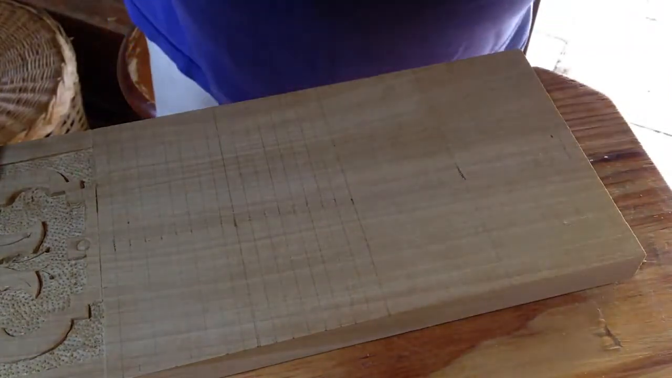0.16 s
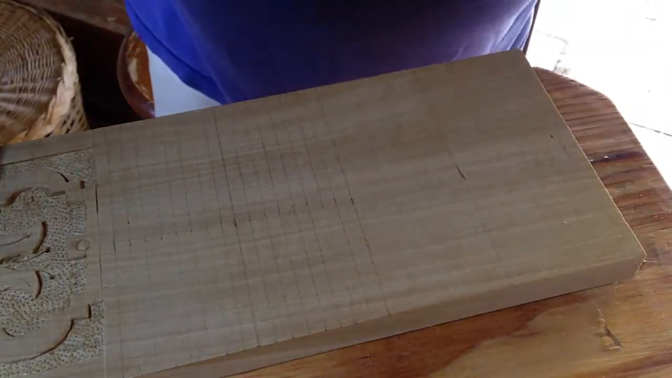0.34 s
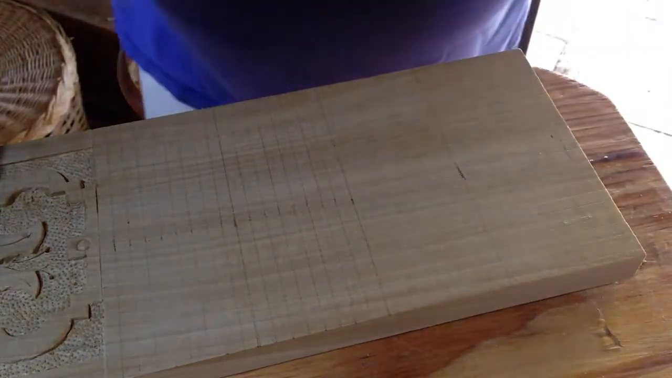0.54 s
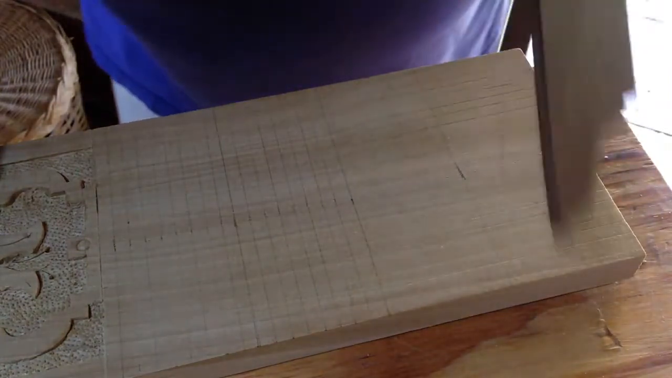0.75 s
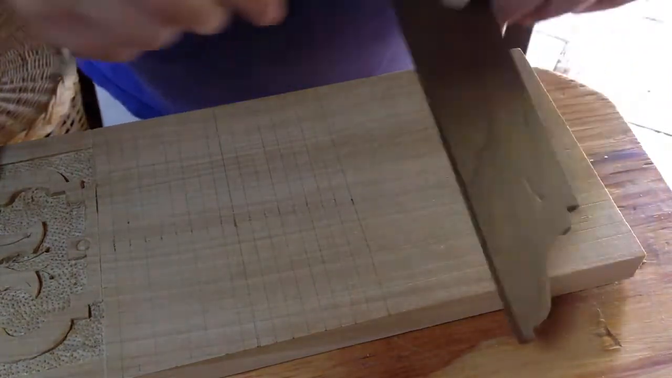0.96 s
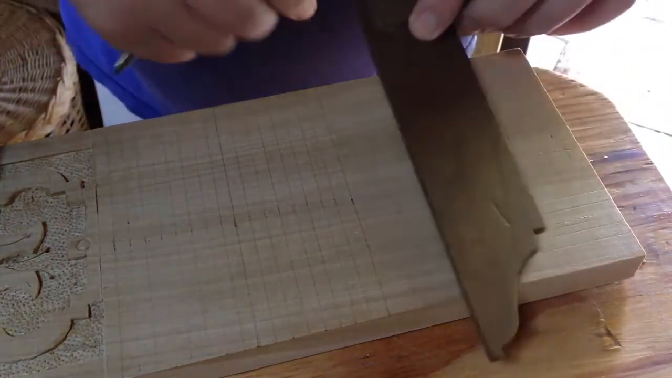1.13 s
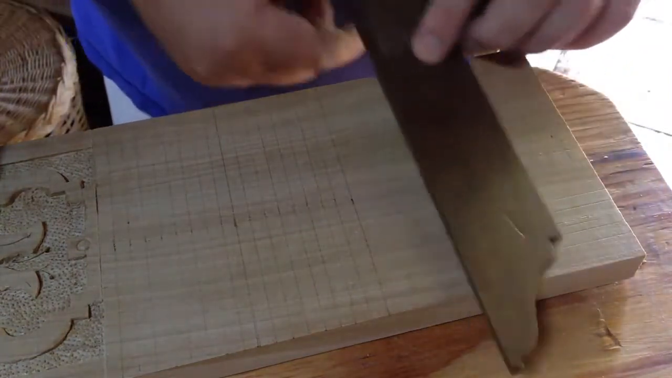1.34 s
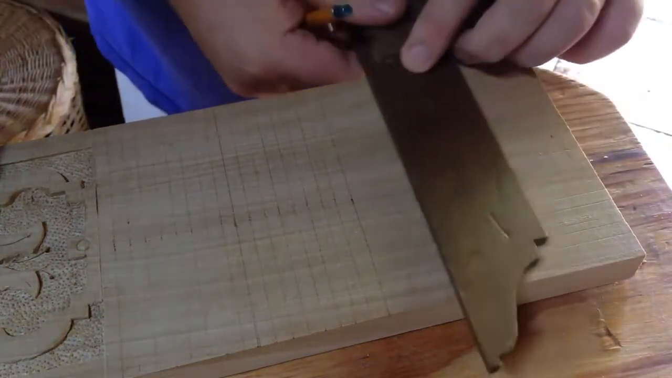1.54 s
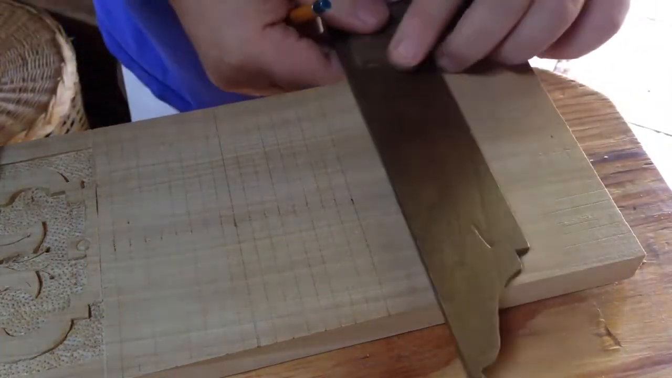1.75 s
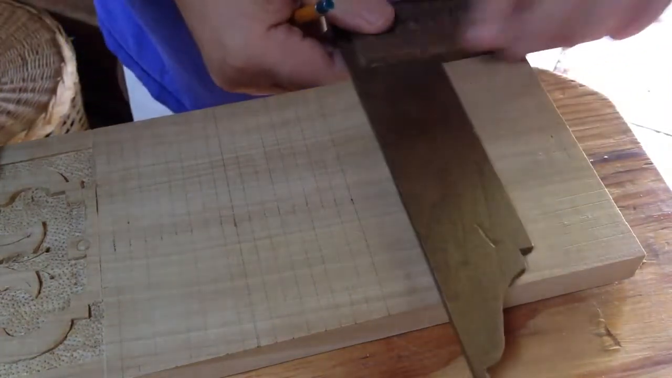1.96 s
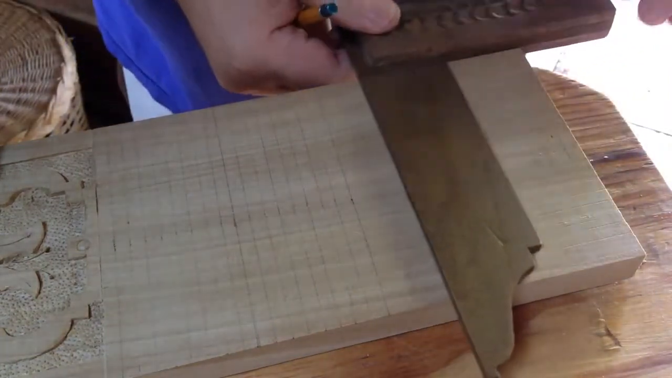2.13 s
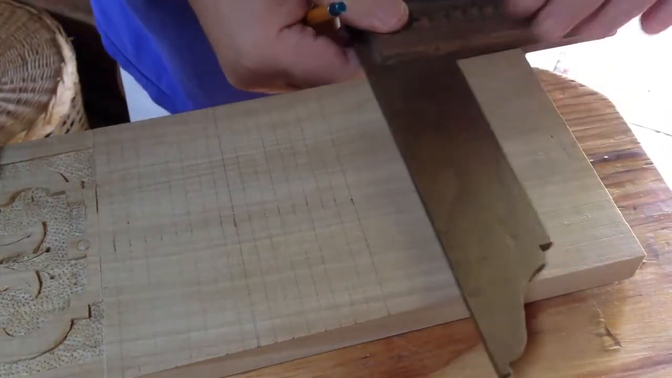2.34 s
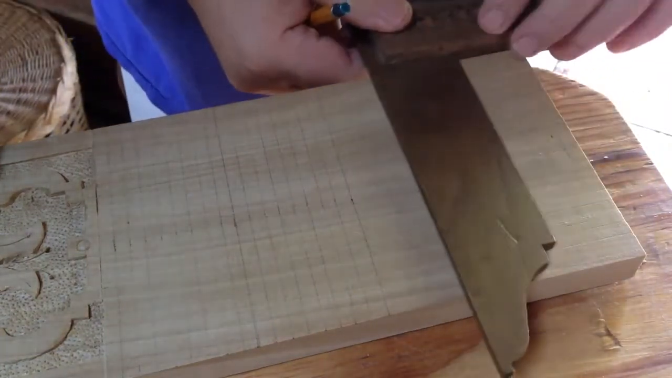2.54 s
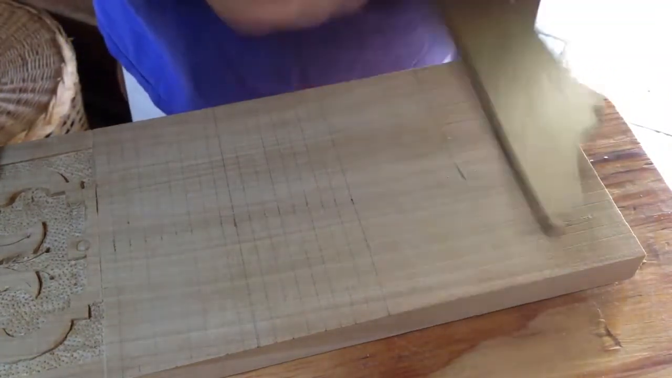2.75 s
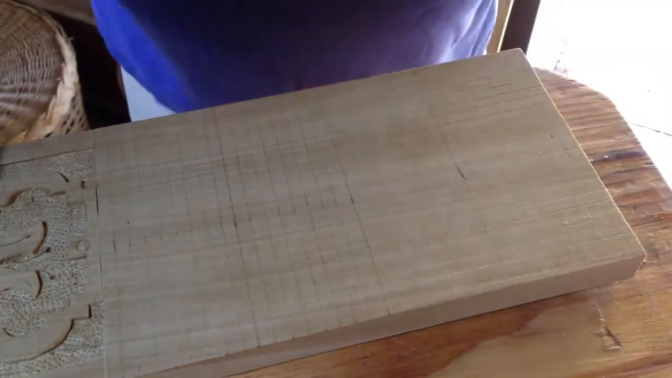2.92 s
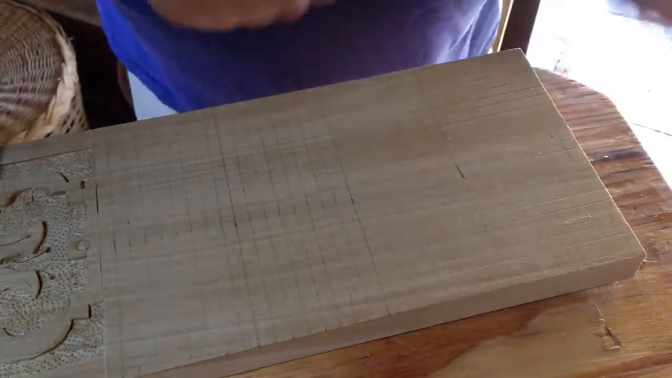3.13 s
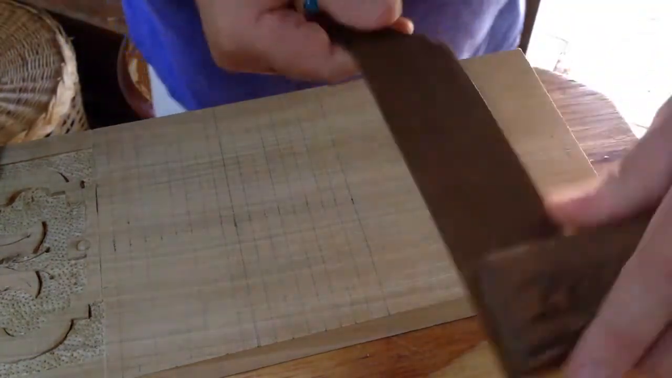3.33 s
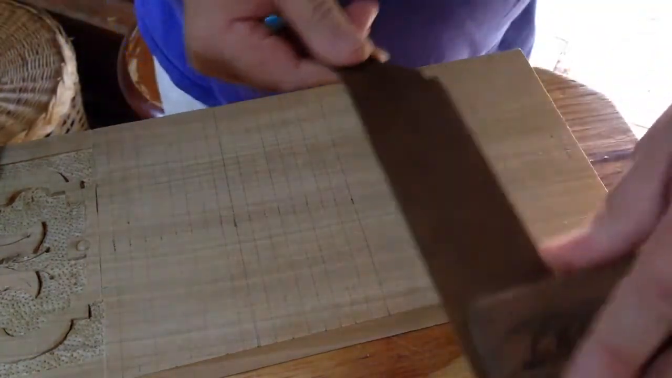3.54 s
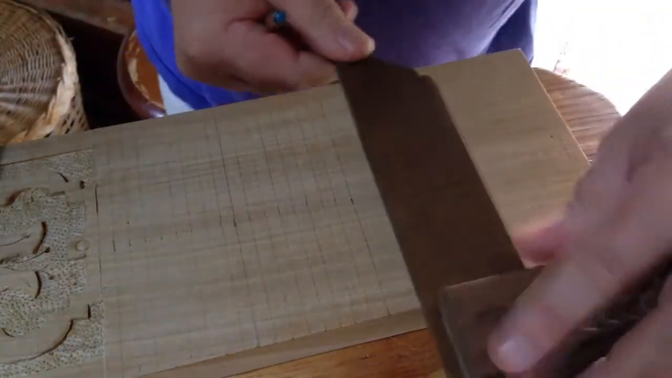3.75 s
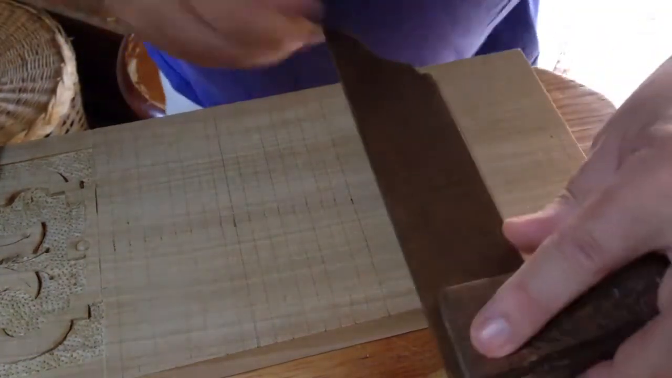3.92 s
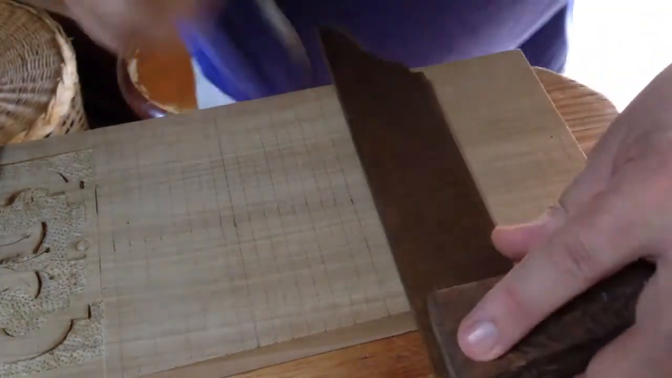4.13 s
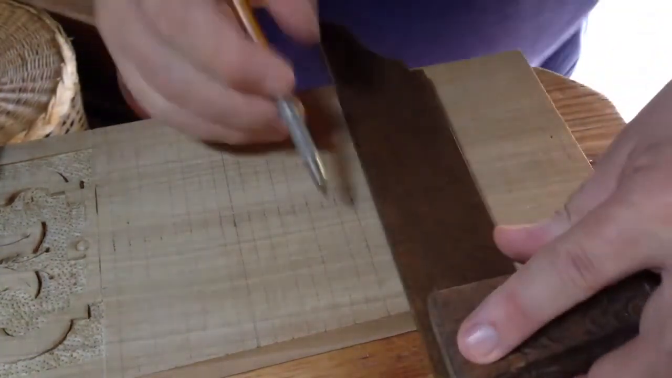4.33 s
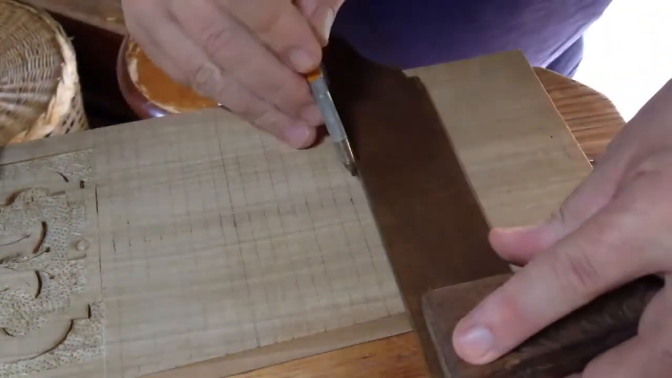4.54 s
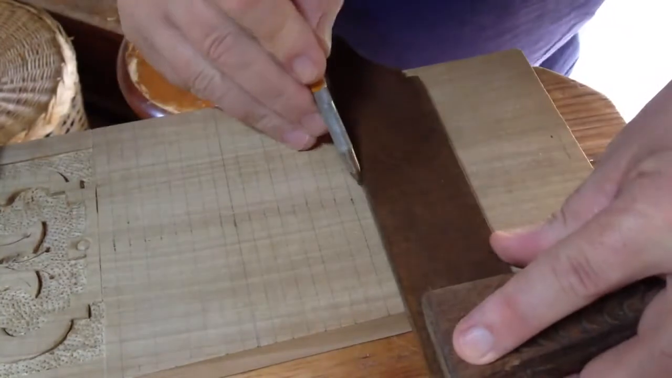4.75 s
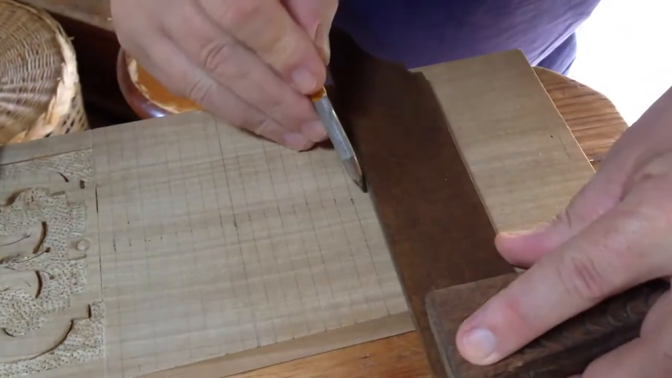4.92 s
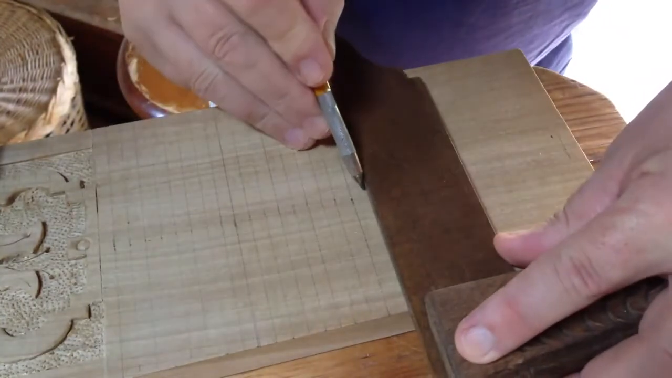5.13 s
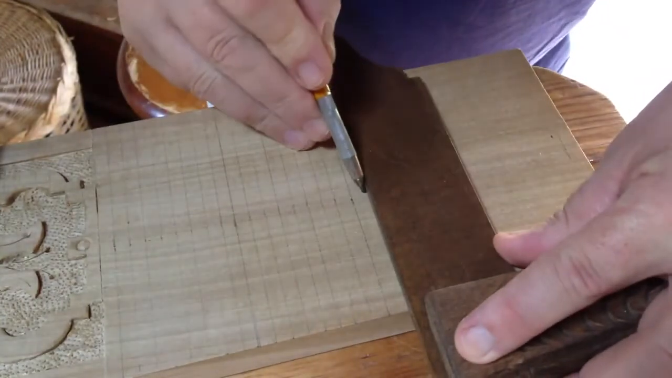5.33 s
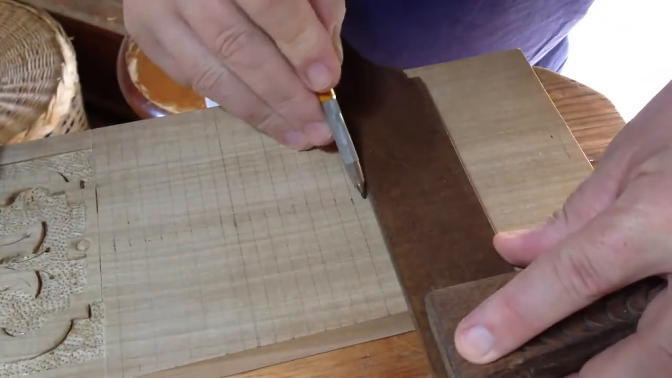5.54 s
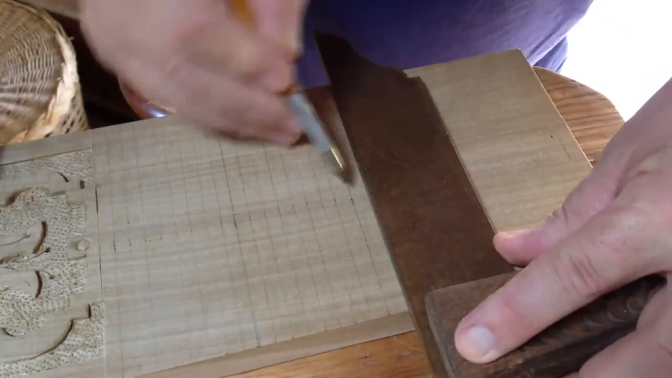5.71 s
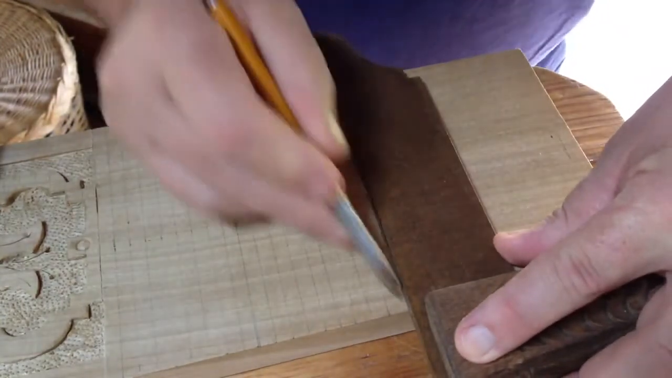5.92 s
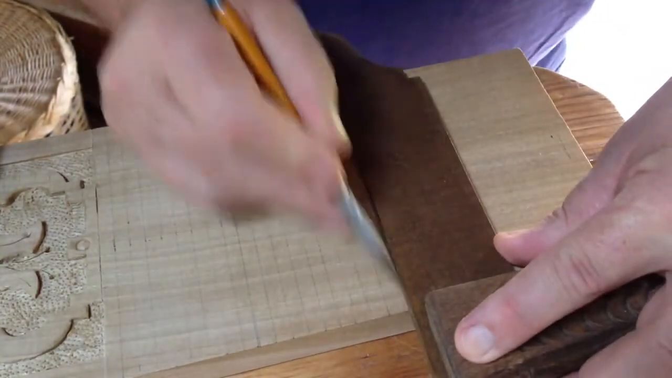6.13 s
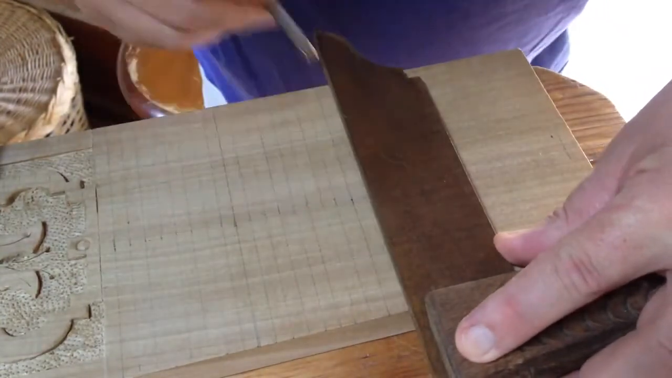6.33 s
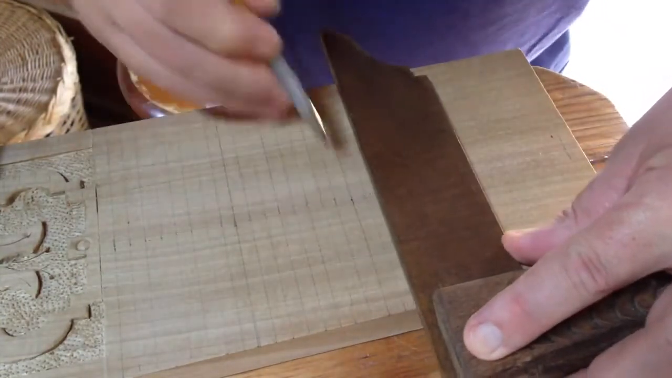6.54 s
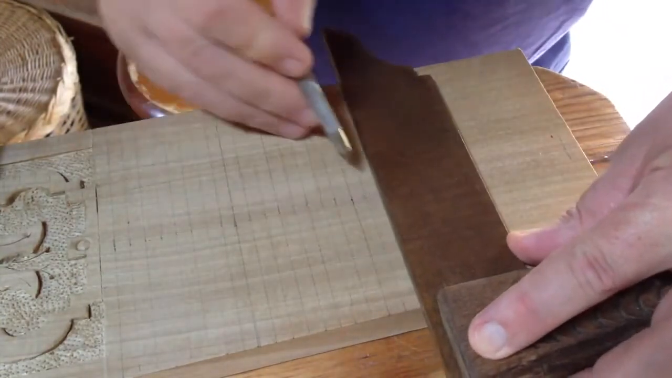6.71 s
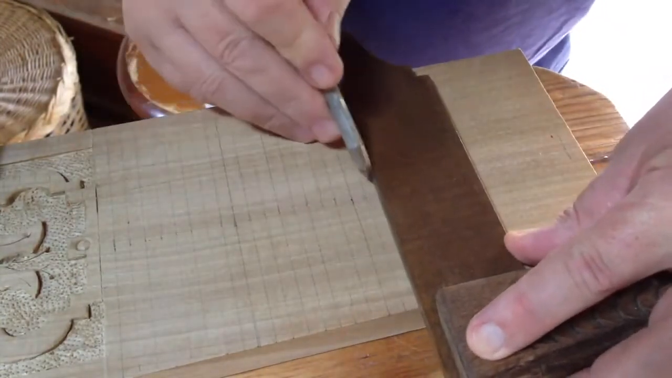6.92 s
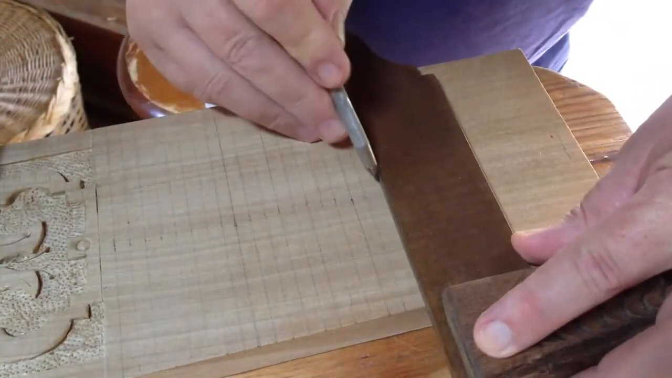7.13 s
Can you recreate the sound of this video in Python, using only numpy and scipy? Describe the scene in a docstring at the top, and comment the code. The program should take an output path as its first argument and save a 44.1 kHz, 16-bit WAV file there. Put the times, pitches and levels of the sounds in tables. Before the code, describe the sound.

A steel square knocks and slides on a wooden board, then a pencil scratches one short line in a quiet workshop.

```python
"""A steel try square is laid on a wooden board, turned over and set down again, close by in a workshop.
Knocks ring the modes of blade and board; sliding drives the steel with tiny friction slips.
A pencil taps the board, then scratches one line across the grain: hiss, shaft chatter, point judder.
A machine hums faintly and small birds whistle far outside."""
import sys
import numpy as np
from scipy import signal
from scipy.fft import rfft, irfft, next_fast_len
from scipy.io import wavfile
from scipy.ndimage import map_coordinates

SR = 44100
rng = np.random.default_rng(int(sys.argv[2]) if len(sys.argv) > 2 else 0)


def generate_wav(signal):
    """Clip the signal to [-1, 1] and save it as 16-bit WAV at the path in sys.argv[1]."""
    frames = np.transpose(np.atleast_2d(signal))
    scaled = np.clip(frames, -1, 1) * 32767
    pcm = np.round(scaled).astype(np.int16)
    wavfile.write(sys.argv[1], SR, pcm)


N = 320607
TIME = np.arange(N) / SR
AGE = TIME[:SR // 2]  # since a blow, s
TOP_HZ = 15400
TOUCH_S, LIFT_T60_S = 0.0056, 0.065  # contact attack, release

# board modes: f/Hz, level/dB, t60/s
BOARD_MODES = [(275, -15, 0.1), (406, -8.5, 0.044), (600, -17, 0.07), (721, -8.5, 0.05), (850, -13, 0.033),
               (1025, -6, 0.024), (1327, -0.5, 0.02), (1498, -2.5, .024), (1950, 0.5, 0.00897),
               (2710, 5, 0.011), (3550, 3.5, 0.011), (4100, -1.5, 0.012), (5325, -15.5, 0.0091)]
# modes of the rubbed or grazed blade: f/Hz, level/dB, t60/s
GRAZED_MODES = [(1380, -10.5, 0.073), (1770, -6.5, 0.018), (2110, -7, 0.03), (2400, -10.5, 0.027),
                (3330, 0, 0.02), (3810, -1.5, 0.016), (4714, -3.5, 0.024), (5180, -0.5, 0.01705),
                (6100, -7, 0.022), (6470, -4, 0.025), (7660, -1, 0.014), (8340, -2.5, 0.012)]


def amp(db):
    """dB to gain."""
    return 10 ** (np.asarray(db) / 20)


def unit(x):
    """Scale to rms 1."""
    return x / np.sqrt(np.mean(x ** 2) + 1e-20)


def along(points, hz):
    """Interpolate (f/Hz, value) points on a log axis."""
    f, v = np.transpose(points)
    return np.interp(np.log(hz + 1), np.log(f + 1), v)


def curve(points):
    """Interpolate (t/s, value) points per sample."""
    return np.interp(TIME, *np.transpose(points))


def wobble(knots_per_s):
    """Smooth random curve."""
    return map_coordinates(rng.standard_normal(int(N * knots_per_s / SR) + 4), [TIME * knots_per_s])


def filtered(x, response):
    """Apply a gain given as a function of f/Hz."""
    size = next_fast_len(N + SR // 2)
    return irfft(rfft(x, size) * response(np.fft.rfftfreq(size, 1 / SR)), size)[:N]


def coloured(x, spectrum):
    """Shape x by (f/Hz, level/dB) points; rms 1."""
    return unit(filtered(x, lambda hz: amp(along(spectrum, hz))))


def fade(t60_s):
    """Exponential decay."""
    return np.exp(-np.log(1000) * AGE / t60_s)


def gate(start_s, length_s, rise_s, t60_s):
    """Contact gain: attack, hold, release."""
    since_s = np.maximum(TIME - start_s, 0)
    release = np.exp(-np.log(1000) * np.maximum(since_s - length_s, 0) / t60_s)
    return (1 - np.exp(-since_s / rise_s)) * release


def swell(peak_s, length_s, db, edge_db):
    """Slide gain: speeds up, slows down; edge_db lower at both ends."""
    return amp(np.maximum(db - edge_db * (2 * (TIME - peak_s) / length_s) ** 2, -200))


def add(track, start_s, sound):
    """Mix in place."""
    part = track[round(start_s * SR):][:len(sound)]
    part += sound[:len(part)]


def favouring(modes, favoured_hz, db_per_oct):
    """The contact point weights modes by their distance from one pitch."""
    return [(hz, db - db_per_oct * abs(np.log2(hz / favoured_hz)), t60_s) for hz, db, t60_s in modes]


def ring(modes, scatter_db):
    """Impulse response; neighbouring modes swing in opposite directions."""
    out = np.zeros(len(AGE))
    for k, (hz, db, t60_s) in enumerate(modes):
        gain = (-1) ** k * amp(db + scatter_db * rng.standard_normal())
        out += gain * fade(t60_s) * np.sin(2 * np.pi * hz * AGE)
    return out


def blow(modes, contact_hz, wash_db, wash_t60_s, t60_scale, rise_s=0.00046, low_hz=210):
    """Main modes plus a noise wash for the weak ones, dulled by a soft contact; peak 1."""
    held = [(hz, db, t60_s * t60_scale) for hz, db, t60_s in modes]
    x = ring(held, scatter_db=2.36)
    x += amp(wash_db) * fade(wash_t60_s) * rng.standard_normal(len(AGE))
    x *= 1 - np.exp(-AGE / rise_s)  # wave spreads through the body
    x = signal.sosfilt(signal.butter(2, low_hz, "high", fs=SR, output="sos"), x)  # small radiator
    x = signal.sosfilt(signal.butter(4, min(contact_hz, TOP_HZ), fs=SR, output="sos"), x)
    return x / np.abs(x).max()


def slips(per_s, spread_db, smooth_db):
    """Friction force: random tiny slips over a smooth rub; rms 1."""
    sizes = amp(spread_db * np.clip(rng.standard_normal(N), -2, 2)) * rng.choice([-1, 1], N)
    pulses = unit(sizes * (rng.random(N) < per_s / SR))
    return unit(pulses + amp(smooth_db) * rng.standard_normal(N))


def rubbed(force, modes, moves, favoured_hz, db_per_oct, wander_db):
    """Friction-driven modes; each move (a gain curve) weights them about its pitch. Balance wanders."""
    rings = np.array([ring([mode], scatter_db=0) for mode in modes])
    octaves = np.abs(np.log2(np.array(modes)[:, :1] / favoured_hz))
    share = amp(-db_per_oct * octaves) ** 2
    share /= np.sum(rings ** 2, axis=1) @ share  # unit energy per move
    drives = np.sqrt(share @ moves ** 2)
    out = np.zeros(N)
    for k, drive in enumerate(drives):
        out += (-1) ** k * signal.fftconvolve(force * drive * amp(wander_db * wobble(15)), rings[k])[:N]
    return out


def gliding(force, hz, t60_s):
    """One resonance of moving pitch; rms 1."""
    turn = np.exp(2j * np.pi * np.cumsum(hz) / SR)
    pole = np.exp(-np.log(1000) / (t60_s * SR))
    return unit(np.imag(turn * signal.lfilter([1], [1, -pole], force / turn)))


def room_air(level_db=-65):
    """Steady low noise of still air."""
    # air spectrum: f/Hz, level/dB
    spectrum = [(15, -44.5), (54, -4.5), (152, -1), (180, -6), (370, -14.5), (437, -15.5), (561, -20.5),
                (1520, -25.5), (2070, -26.5), (2310, -23), (15300, -29)]
    return amp(level_db) * coloured(rng.standard_normal(N), spectrum)


def machine_hum(hum_hz=153):
    """Slightly unsteady tone with a weak octave."""
    # slow drift of the hum: t/s, level/dB
    drift = [(0, -80), (1.5, -74.5), (2.55, -57.5), (3.6, -62.5), (4.2, -63), (4.9, -65.5), (5.5, -64),
             (6.3, -60.5), (7.27, -66.5)]
    phase = 2 * np.pi * np.cumsum(hum_hz + 0.71 * wobble(2.8)) / SR
    level_db = curve(drift) + wobble(5)
    return amp(level_db) * unit(np.sin(phase) + amp(-28) * np.sin(2 * phase))


def birds():
    """Thin, wavering whistles with a lingering outdoor echo."""
    # distant calls: t/s, length/s, f/Hz, level/dB
    calls = [(1.606, 0.071, 3030, -62.5), (4.343, 0.05, 2470, -62), (4.44, 0.17, 4280, -73),
             (4.554, 0.1, 2425, -66.5), (6.53, 0.028, 3165, -70.5), (6.574, 0.03, 3180, -71),
             (6.607, 0.11, 4770, -70), (6.741, 0.13, 4760, -74), (6.947, 0.026, 3170, -68),
             (6.98, 0.046, 3180, -73), (7.028, 0.16, 4686, -66.5)]
    song = np.zeros(N)
    waver = 1 + 0.0038 * wobble(55)
    for start_s, length_s, hz, db in calls:
        envelope = np.sqrt(np.abs(np.hanning(round(length_s * SR))))
        pitch_hz = hz * waver[round(start_s * SR):][:len(envelope)]
        add(song, start_s, amp(db) * envelope * np.sin(2 * np.pi * np.cumsum(pitch_hz) / SR))
    yard = fade(t60_s=1) * rng.standard_normal(len(AGE))
    return song + amp(-5) * signal.fftconvolve(song, yard / np.linalg.norm(yard))[:N]


def workshop_echo(x, delay_s=0.0084):
    """Wall reflections; treble dies first."""
    # room decay: f/Hz, t60/s
    decay = [(200, 0.63), (600, 0.41), (1500, 0.31), (4000, 0.24), (10000, 0.13)]
    hz, age_s, bands = signal.stft(rng.standard_normal(SR // 2), SR, nperseg=256)
    bands *= np.exp(-np.log(1000) * age_s / along(decay, hz)[:, None])
    _, tail = signal.istft(bands, SR, nperseg=256)
    tail = np.pad(tail / np.linalg.norm(tail), (round(delay_s * SR), 0))
    return signal.fftconvolve(x, tail)[:N]


def table_rocking(rise_s=0.007, t60_s=0.21):
    """The table gives under the leaning hand with dull thumps."""
    # rocking: t/s, level/dB
    rocks = [(3.737, -44.5), (3.88, -54.5), (3.94, -57.5), (4.06, -58)]
    # thump spectrum: f/Hz, level/dB
    spectrum = [(20, -19), (48, 3), (85, -0.5), (115, 7.5), (160, -20), (400, -52)]
    envelope = sum(amp(db) * gate(start_s, 2 * rise_s, rise_s, t60_s) for start_s, db in rocks)
    return envelope * coloured(rng.standard_normal(N), spectrum)


def board_taps():
    """Fingers and pencil ring only the board."""
    # light touches: t/s, level/dB, contact cutoff/Hz, favoured f/Hz
    touches = [(0.296, -55.5, 1290, 1000), (1.681, -52.5, 1330, 500), (5.6237, -57, 1800, 1100),
               (2.582, -52.5, 1890, 1380), (4.036, -47.5, 700, 450), (4.6898, -41.5, 3120, 1450),
               (4.768, -47, 2200, 1400), (5.052, -54, 1400, 720), (5.73, -49.5, 2400, 1390),
               (6.037, -47, 3200, 1400), (6.05, -45, 2780, 1700), (6.078, -47.5, 2800, 1400),
               (6.691, -57, 1800, 1400), (7.174, -53.5, 1290, 720)]
    out = np.zeros(N)
    for start_s, db, contact_hz, favoured_hz in touches:
        modes = favouring(BOARD_MODES, favoured_hz, db_per_oct=6.5)
        tap = blow(modes, contact_hz, wash_db=1, wash_t60_s=0.06, t60_scale=1.14, rise_s=0.00074)
        add(out, start_s, amp(db) * tap)
    return out


def pencil(speed_up_s=0.022, press_db_per_s=19):
    """Graphite hisses and the shaft chatters with speed; the point digs in, judders and catches."""
    # three light trials, then the line in four pushes:
    # t/s, length/s, hiss/dB, chatter/dB, final bite/dB, favoured f/Hz, focus/(dB/oct)
    strokes = [(5.713, 0.024, -65, -86, -62.5, 1390, 2), (5.899, 0.086, -64.5, -81, -68, 3500, 8.5),
               (6.017, 0.079, -67, -70, -63, 1200, -6), (6.174, 0.093, -59, -50.5, -53.5, 700, 4.5),
               (6.238, 0.068, -57, -55, -49, 3500, 7.5), (6.307, 0.041, -50.5, -53, -42, 1380, 8),
               (6.351, 0.065, -52.5, -46.5, -42, 1900, -2.5)]
    # hiss spectrum: f/Hz, level/dB
    graphite = [(250, -32), (420, 11), (1000, -5.5), (2500, 1), (3900, 3.5), (4500, 3), (6200, 3),
                (7600, -7.5), (9200, -5), (12000, -10), (14300, -8), (15000, -31.5)]
    # shaft resonance as the pencil tilts: t/s, f/Hz
    shaft = [(6.18, 2700), (6.21, 2330), (6.245, 2530), (6.32, 2210), (6.36, 2230), (6.41, 2500)]
    # modes of pencil and board under the point: f/Hz, level/dB, t60/s
    point_modes = [(427, -32, 0.032), (704, -9, 0.054), (1087, -7, 0.034), (1190, -6.5, 0.027),
                   (1350, 0.5, 0.027), (1877, 1.5, 0.019), (2290, -9, 0.03), (3430, -7.5, 0.015),
                   (4450, -13, 0.0085)]
    # catches on hard growth rings: t/s, level/dB
    catches = [(6.312, -33), (6.3298, -33), (6.350, -35), (6.3593, -28.5), (6.3697, -28.5), (6.378, -28.5),
               (6.4056, -29)]
    speed, pressure = np.zeros((2, len(strokes), N))
    for k, (start_s, length_s, *_) in enumerate(strokes):
        speed[k] = gate(start_s, length_s, speed_up_s, LIFT_T60_S)
        left_s = np.maximum(start_s + length_s - TIME, 0)
        pressure[k] = gate(start_s, length_s, TOUCH_S, LIFT_T60_S) * amp(-press_db_per_s * left_s)
    _, _, hiss_db, chatter_db, bite_db, favoured_hz, db_per_oct = np.transpose(strokes)
    hiss = amp(hiss_db) @ speed * coloured(slips(3000, spread_db=9, smooth_db=1.5), graphite)
    shaft_force = slips(1300, spread_db=-4.5, smooth_db=2)
    chatter = amp(chatter_db) @ speed * gliding(shaft_force, curve(shaft), t60_s=0.015)
    judder = slips(1000, spread_db=2.5, smooth_db=-13)
    pushes = amp(bite_db)[:, None] * pressure
    bite = rubbed(judder, point_modes, pushes, favoured_hz, db_per_oct, wander_db=1.8)
    grain_db = 0.72 * wobble(90)  # hard and soft wood pass under the point
    out = amp(grain_db) * (hiss + chatter + bite)
    for start_s, db in catches:
        click = blow(point_modes, contact_hz=9030, wash_db=-11, wash_t60_s=0.012,
                     t60_scale=0.95, rise_s=0.0001)
        add(out, start_s, amp(db) * click)
    return out


def stock_sliding():
    """The square's wooden stock rubs along the board's edge."""
    # pushes: peak t/s, length/s, level/dB
    shoves = [(3.616, 0.17, -61), (3.72, 0.2, -53), (4, 0.23, -61), (4.6, 0.89, -75)]
    # wood-on-wood spectrum: f/Hz, level/dB
    spectrum = [(88, -59), (150, 1.5), (265, -2), (562, -11.5), (1600, -11.5), (2920, -17.5), (3510, -14),
                (12000, -28.5), (15600, -66.5), (22000, -120)]
    push = np.linalg.norm([swell(*shove, edge_db=5) for shove in shoves], axis=0)
    flicker = amp(0.98 * wobble(56))
    return push * flicker * coloured(slips(740, spread_db=-2.5, smooth_db=1.5), spectrum)


def blade_rubbing():
    """Skin and wood slide on the steel: blade modes plus skin hiss."""
    # slides: peak t/s, length/s, level/dB, favoured f/Hz, focus/(dB/oct)
    slides = [(0.034, 0.46, -70, 5000, 1), (0.579, 0.03, -63.5, 5030, 10), (0.684, 0.017, -59.5, 6050, 16),
              (1.219, 0.04, -57, 3300, -1), (1.358, 0.036, -60, 5000, 12), (1.424, 0.025, -59, 5640, 4),
              (1.45, 0.044, -57.5, 1380, 31), (1.457, 0.028, -56.5, 3700, 14),
              (1.524, 0.064, -61.5, 5080, -2.5), (2.03, 0.42, -74.5, 6190, 7), (2.103, 0.53, -79, 1390, 21),
              (2.749, 0.086, -63, 3950, 1.5), (2.882, 0.035, -51, 3350, 12.5),
              (2.918, 0.68, -70, 1885, 13.5), (3.084, 0.12, -65, 5070, 5), (3.227, 0.08, -68, 5200, 8),
              (3.288, 0.018, -59.5, 4970, 4.5), (3.456, 0.15, -64, 5220, 6.5), (3.84, 0.05, -65, 3350, 19),
              (4.0, 0.016, -54, 3300, -1), (4.441, 0.045, -69, 6580, -1), (4.655, 0.36, -71, 1740, 13)]
    # skin friction spectrum: f/Hz, level/dB
    skin = [(800, -11.5), (2500, 0.5), (8500, -2), (15000, -6.5)]
    grip_db = 2.5 * wobble(45)  # skin grips and lets go
    force = unit(amp(grip_db) * slips(1400, spread_db=0, smooth_db=-7.5))
    moves = np.array([swell(peak_s, length_s, db, edge_db=5.5) for peak_s, length_s, db, *_ in slides])
    *_, favoured_hz, db_per_oct = np.transpose(slides)
    steel = rubbed(force, GRAZED_MODES, moves, favoured_hz, db_per_oct, wander_db=3)
    hiss = amp(-9.5) * np.linalg.norm(moves, axis=0) * coloured(force, skin)
    return steel + hiss


def blade_ticks():
    """The edge glances off the board with a thin, bright ring."""
    # glances: t/s, level/dB, favoured f/Hz, focus/(dB/oct)
    glances = [(0.6835, -41.5, 2100, 6.5), (2.8936, -36, 3400, 2), (4.003, -51, 3400, -3.5),
               (7.085, -53, 3625, -1)]
    out = np.zeros(N)
    for start_s, db, favoured_hz, db_per_oct in glances:
        modes = favouring(GRAZED_MODES, favoured_hz, db_per_oct)
        tick = blow(modes, contact_hz=8600, wash_db=-10, wash_t60_s=0.026,
                    t60_scale=0.98, rise_s=0.0014, low_hz=1720)
        add(out, start_s, amp(db) * tick)
    return out


def stock_rattle(start_s=3.536, length_s=0.0386, level_db=-44.5):
    """After the hardest knock the stock chatters to rest on the board."""
    # stock modes: f/Hz, level/dB, t60/s
    modes = [(887, -1, .028), (1054, -6.5, 0.024), (1703, 4, 0.031), (2293, -1.5, .008)]
    chatter = slips(520, spread_db=1.5, smooth_db=-18) * gate(start_s, length_s, TOUCH_S, LIFT_T60_S)
    body = ring(modes, scatter_db=-3)
    return amp(level_db) * signal.fftconvolve(chatter, body / np.linalg.norm(body))[:N]


def square_knocks(bend_hz=299, bend_t60_s=0.079, bend_db=-6):
    """Knocks ring blade and board, damped by the hand; a loosely held blade also bends slowly."""
    # square meets board:
    # t/s, blade/dB, board/dB, contact cutoff/Hz, held/free t60, board's favoured f/Hz, focus/(dB/oct)
    knocks = [(1.2398, -17, -24.5, 6440, 0.93, 2400, 1.2), (1.2465, -24.5, -28, 2460, 0.33, 1400, 13),
              (1.2722, -22.5, -29.5, 6300, 0.81, 1400, 1), (1.5053, -54, -31, 2450, 1, 690, 6.5),
              (1.8136, -36, -37.5, 4200, 0.85, 720, -0.5), (3.521, -33, -13, 3600, 0.97, 2735, 0.6),
              (3.6882, -22, -21, 4060, 1, 3000, 4), (3.6963, -33, -24.5, 1960, 0.64, 1400, 1.5),
              (3.7101, -19.5, -19.5, 5300, 0.9, 2700, 10), (3.852, -39.5, -31, 653, 1, 503, 9)]
    # struck blade modes: f/Hz, level/dB, free t60/s
    blade_modes = [(440, -18, 0.08), (560, -18, 0.08), (1265, -1.5, 0.028), (1385, 4, 0.031),
                   (2165, -20, 0.09), (2460, -9, 0.05), (3290, -17, .045), (4700, -10.5, 0.035),
                   (5280, -4, .012), (6600, -12.5, .024)]
    blade, board = np.zeros((2, N))
    bending = (fade(bend_t60_s) - fade(0.035)) * np.sin(2 * np.pi * bend_hz * AGE)
    for start_s, blade_db, board_db, contact_hz, t60_scale, favoured_hz, db_per_oct in knocks:
        clink = blow(blade_modes, contact_hz, wash_db=-27.5, wash_t60_s=0.011, t60_scale=t60_scale)
        bend = amp(bend_db) * t60_scale ** 2 * bending
        add(blade, start_s, amp(blade_db) * (clink + bend))
        modes = favouring(BOARD_MODES, favoured_hz, db_per_oct)
        clack = blow(modes, contact_hz, wash_db=-4, wash_t60_s=0.042, t60_scale=t60_scale)
        add(board, start_s, amp(board_db) * clack)
    return blade, board


def scene():
    """Work at the table, its echo and the background; mono."""
    blade, board = square_knocks()
    wood = board + board_taps() + stock_rattle()
    handling = blade_rubbing() + stock_sliding() + table_rocking() + blade_ticks()
    drawing = pencil()
    direct = blade + wood + handling + drawing
    to_walls = amp(-17) * blade + amp(-15.5) * wood + amp(-12.5) * handling + amp(-16) * drawing
    return (direct + workshop_echo(to_walls) + birds() + machine_hum() + room_air())[None]


def record(dry):
    """Brick-wall low-pass at TOP_HZ."""
    return filtered(dry[0], lambda hz: hz < TOP_HZ)[None]


dry = scene()
out = record(dry)
generate_wav(out)
```